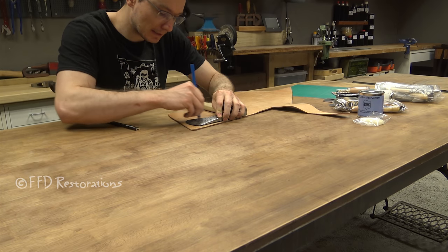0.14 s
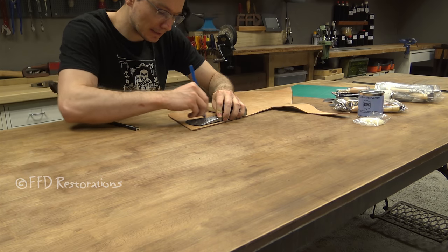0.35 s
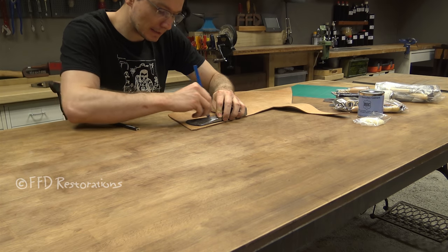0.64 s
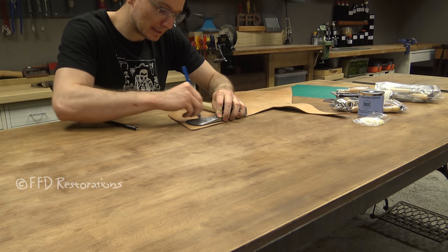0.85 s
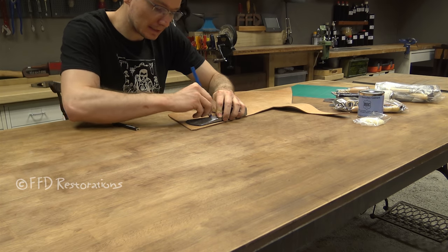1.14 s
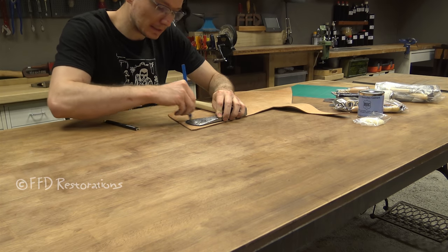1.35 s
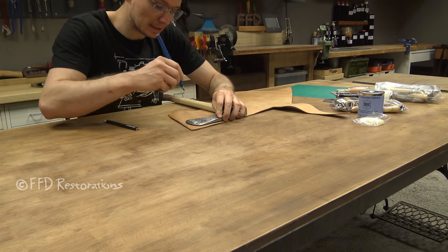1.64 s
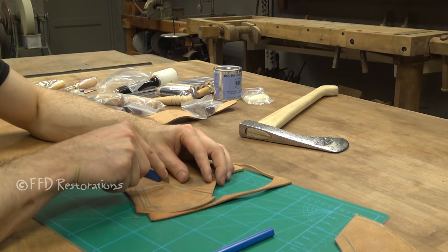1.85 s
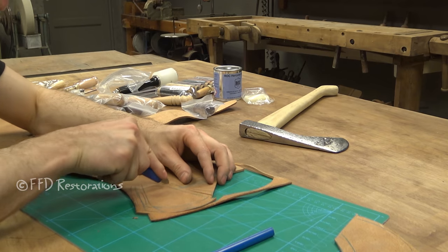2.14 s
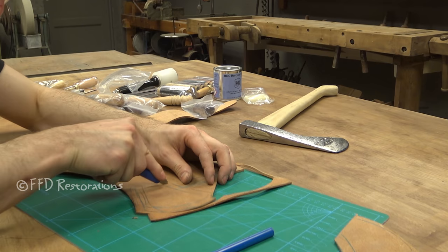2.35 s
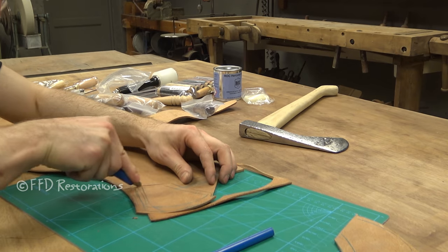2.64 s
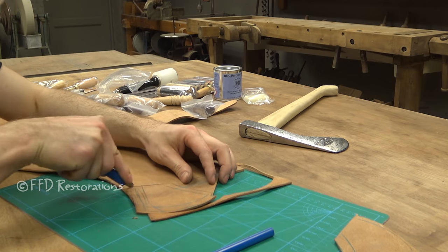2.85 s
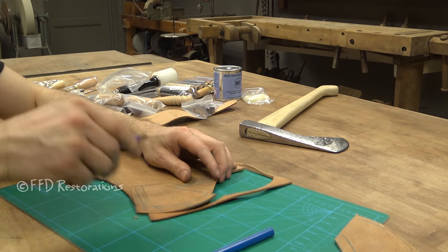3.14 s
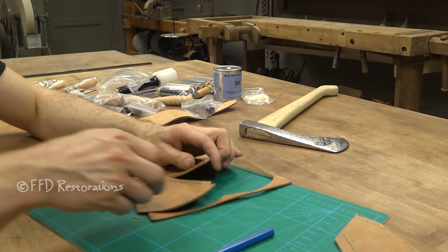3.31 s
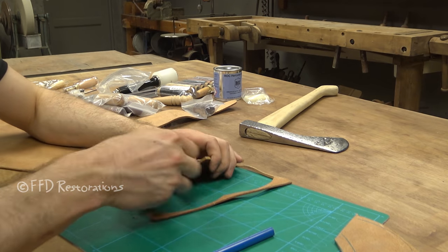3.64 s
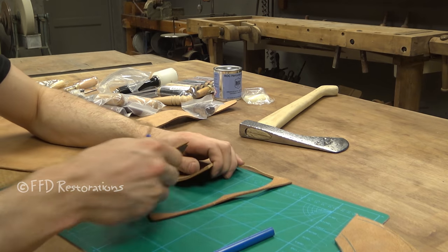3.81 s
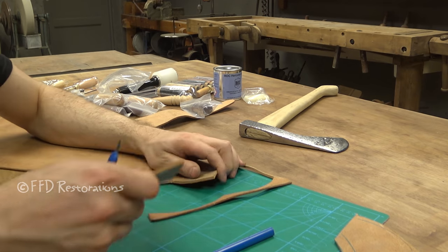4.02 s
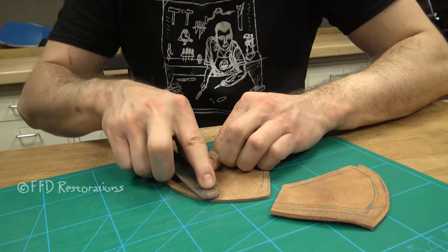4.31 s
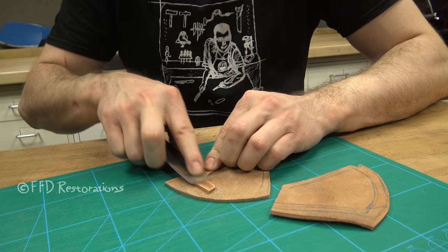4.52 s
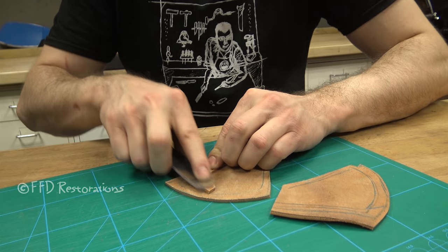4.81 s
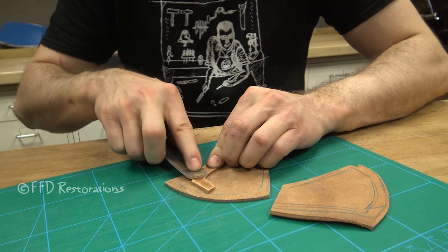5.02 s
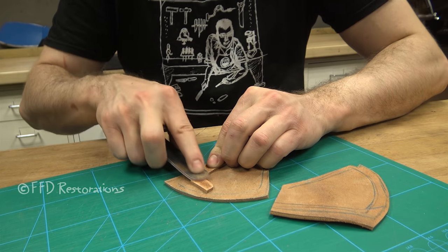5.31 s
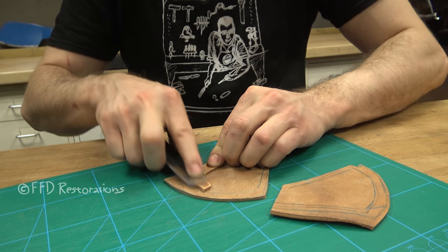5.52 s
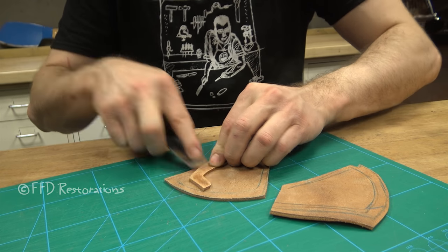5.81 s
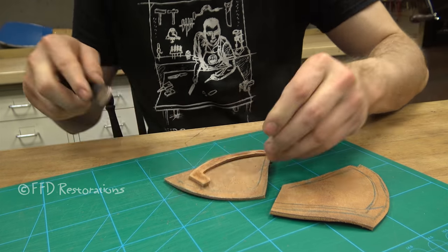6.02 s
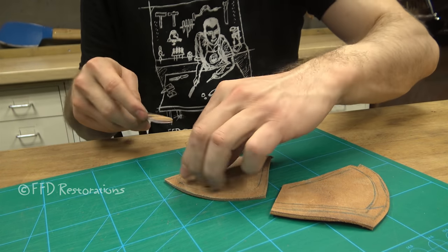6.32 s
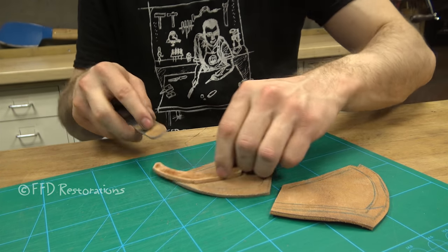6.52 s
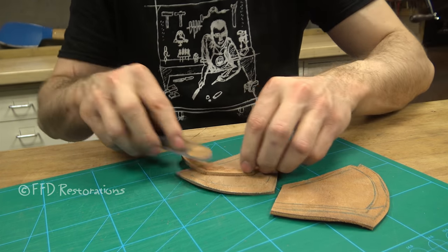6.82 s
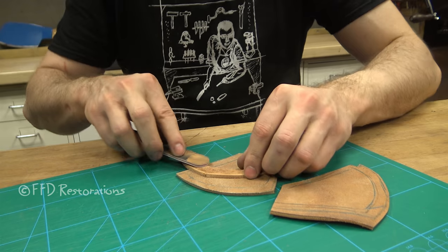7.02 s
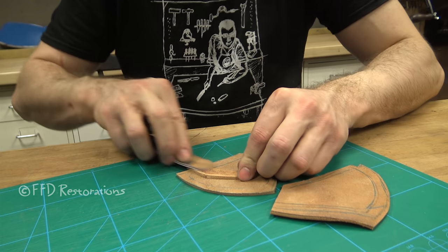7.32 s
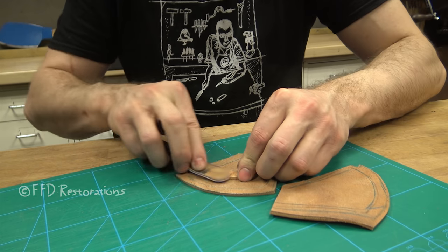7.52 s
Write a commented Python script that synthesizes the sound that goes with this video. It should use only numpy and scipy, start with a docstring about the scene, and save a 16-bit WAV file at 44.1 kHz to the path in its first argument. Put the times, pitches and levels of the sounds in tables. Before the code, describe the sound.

A pen scratches in short strokes on leather, then a knife drags and knocks on a cutting mat, then a block sands an edge rapidly.

```python
"""A pen scratches round an axe head on leather, its pressure droning through the workshop bench.
Then a knife cuts the hide on a mat and is put down; last, a sanding block rubs an edge to and fro.
Rubbing is uneven noise shaped by resonances; ticks are short noise bursts; thuds are decaying bench modes.
The bench sways as slow sines during the last job; a hard-walled room answers with decaying noise.
Mains hum and a faint hiss lie beneath."""
import sys
import numpy as np
from scipy import signal
from scipy.fft import rfft, irfft, next_fast_len
from scipy.io import wavfile
from scipy.ndimage import uniform_filter1d, map_coordinates

SR = 44100
rng = np.random.default_rng(int(sys.argv[2]) if len(sys.argv) > 2 else 0)


def int16_out(signal):
    """Quantize to a 16-bit WAV file."""
    q = np.round(np.clip(np.atleast_2d(signal).T, -1, 1) * 32767)
    wavfile.write(sys.argv[1], SR, q.astype(np.int16))


def volts_from_db(level):
    """Convert decibel levels to linear amplitude ratios."""
    exponent = np.asarray(level, float) / 20
    return 10 ** exponent


N = 337806
TIME = np.arange(N) / SR
# two loose modes of the bench, slow and fast: f/Hz
SWAY_MODES = (10.6, 25.5)


def unit(x):
    """Normalisation of power: x scaled to rms 1."""
    return x / np.sqrt(np.mean(x ** 2) + 1e-20)


def along(points, hz):
    """Spectral interpolation: (f/Hz, value) points read on a logarithmic frequency axis."""
    f, v = np.transpose(points)
    return np.interp(np.log(hz + 1), np.log(f + 1), v)


def gains(rows):
    """Envelopes linear in level: one gain per sample for each dB column, silent outside the table."""
    s, *columns = np.transpose(rows)
    return [volts_from_db(np.interp(TIME, s, column, -150, -150)) for column in columns]


def wobble(rate):
    """Slow random modulation: a smooth curve through normal deviates, rate knots a second."""
    knots = rng.standard_normal(int(N * rate / SR) + 4)
    return map_coordinates(knots, [TIME * rate])


def filtered(x, gain):
    """Linear filtering: the spectrum of x times a gain that depends on frequency."""
    m = next_fast_len(len(x) + 8192)
    return irfft(rfft(x, m) * gain(np.fft.rfftfreq(m, 1 / SR)), m)[:len(x)]


def strokes(rows, rise, fall, lag=0):
    """Exponential onset and decay (dB/s) round a hold that swells: rows of t/s, length/s, level/dB, swell/dB."""
    out = np.zeros(N)
    for s, length, db, swell in rows:
        t = TIME - s - lag
        held = db + swell * (np.clip(t / length, 0, 1) - 0.5)
        onset = np.minimum(0, rise * t)
        decay = np.minimum(0, fall * (length - lag - t))
        out += volts_from_db(held + onset + decay)
    return out


def friction(spectrum, peaks, grain_db, flutter_db, patchy_db):
    """Slip of fibres: uneven noise, its colour drifting as the contact moves, shaped by the rubbed body."""
    unevenness = grain_db * wobble(900) + flutter_db * (wobble(25) + wobble(70))
    slips = rng.standard_normal(N) * volts_from_db(unevenness)
    z = signal.stft(slips, nperseg=256)[2]
    patches = uniform_filter1d(rng.standard_normal(z.shape), size=4, axis=0)  # over frequency
    patches = uniform_filter1d(patches, size=12, axis=1)  # over time
    slips = signal.istft(z * volts_from_db(patchy_db * unit(patches)), nperseg=256)[1][:N]

    def body_gain(hz):
        resonances = sum(db / (1 + (2 * (hz - centre) / width) ** 2) for centre, width, db in peaks)
        return volts_from_db(along(spectrum, hz) + resonances)

    return unit(filtered(slips, body_gain))


def background():
    """Stationary noise and tones: the hiss of room air and slightly unsteady mains hum."""
    # both step down near 4.26 s and dip near 6.3 s: t/s, hiss level/dB, hum level/dB
    quiet_levels = [(0, -48, -44), (4.256, -48, -43), (4.262, -53.5, -47), (6.24, -55, -47),
                    (6.3, -63, -59), (6.33, -61.5, -82), (7.66, -49.5, -37.5)]
    # hum lines, the lowest being the idle tremor of the bench: f/Hz, relative level/dB
    hum_lines = [(26.5, -35), (49.5, 2), (99.5, -23), (118, -17.5), (199, -33)]
    # spectrum of the hiss: f/Hz, relative density/dB per Hz
    air_spectrum = [(38, -9), (65, 1.5), (76, -2.5), (108, -10.5), (171, -11), (226, -13.5), (334, -12.5),
                    (383, -14), (607, -21.5), (666, -19), (941, -19), (1750, -26), (5800, -34.5),
                    (7000, -39), (16000, -39.5)]
    hiss, hum = gains(quiet_levels)
    lines = np.zeros(N)
    for hz, db in hum_lines:
        strength = volts_from_db(db + 2.2 * wobble(2.8))
        lines += strength * np.sin(2 * np.pi * hz * TIME + 0.69 * wobble(2.5))
    air = friction(air_spectrum, [], grain_db=0.8, flutter_db=0.4, patchy_db=0.8)
    return hiss * air + hum * np.sqrt(2) * lines


def room(x):
    """Reverberation: convolution with noise in which each frequency decays at its own rate."""
    # reverberation time: f/Hz, t60/s
    decay_times = [(100, 0.63), (500, 0.57), (2000, 0.42), (6000, 0.43), (14000, 0.067)]
    # colour of the tail at its start: f/Hz, relative level/dB
    tail_colour = [(60, 5.5), (1000, 5.5), (4000, 3.5), (14000, -11)]
    out, hop = np.zeros(N + 2 * SR), SR // 3
    for i in range(0, N, hop):  # a new tail every third of a second
        hz, t, z = signal.stft(rng.standard_normal(SR * 3 // 4), SR, nperseg=256)
        level = along(tail_colour, hz)[:, None] - 60 * t / along(decay_times, hz)[:, None]
        tail = signal.istft(z * volts_from_db(level), SR, nperseg=256)[1]
        wet = signal.fftconvolve(x[i:i + hop], tail / np.linalg.norm(tail))
        out[i + 300:][:len(wet)] += wet  # the first wall is some metres away
    return out[:N]


def sway():
    """Forced oscillation: two loose modes of the bench, pushed unevenly by the arm."""
    # t/s, slow sway level/dB, fast sway level/dB, before the random unevenness
    sway_levels = [(4.26, -22, -43), (4.37, -19, -24), (4.44, -16, -42), (4.53, -20.5, -27.5),
                   (5.75, -23.5, -26.5), (5.89, -18, -22), (5.94, -16, -35), (6.02, -31, -25.5),
                   (6.11, -21, -36), (6.16, -20, -29), (6.23, -33.5, -37), (6.34, -24.5, -43),
                   (6.43, -40, -31), (6.5, -27, -36.5), (6.96, -47, -46), (7.04, -42, -35),
                   (7.43, -17.5, -30.5), (7.66, -16.5, -28)]
    out = np.zeros(N)
    for gain, hz in zip(gains(sway_levels), SWAY_MODES):
        push = gain * volts_from_db(1.8 * wobble(11))
        phase = 2 * np.pi * np.cumsum(hz * (1 + 0.099 * wobble(5.4))) / SR
        out += push * np.sqrt(2) * np.sin(phase)
    fade_in = np.clip((TIME - 4.258) / 0.02, 0, 1)
    return fade_in * out


def taps():
    """Impact excitation: noisy ticks of hard edges, thuds in the bench modes, jolts of its fast sway."""
    # hard edges meeting: t/s, peak level/dB, centre f/Hz
    edge_hits = [(0.518, -28, 4000), (1.454, -26.5, 5000), (1.9868, -28.5, 2480), (2.0835, -29.5, 3670),
                 (2.109, -20, 1950), (2.168, -21.5, 1500), (2.172, -30, 11000), (2.1755, -25.5, 4550),
                 (2.212, -15.5, 3820), (2.2185, -15, 3660), (2.2924, -11.5, 7500), (2.4277, -30.5, 2370),
                 (3.012, -21.5, 3500), (3.015, -12.5, 8040), (3.138, -35, 4000), (3.1472, -22.5, 4540),
                 (3.1599, -9.5, 5500), (3.1894, -37, 5000), (3.4106, -26.5, 2770), (3.512, -46, 1800),
                 (3.7542, -30, 4500), (3.8296, -11, 2350), (3.8621, -18, 2940), (3.8695, -14, 3160),
                 (3.892, -23, 2000), (3.915, -28, 2500), (3.935, -27, 4950), (6.0612, -27.5, 2600),
                 (6.099, -36, 2860), (6.1315, -44, 2880), (6.328, -44, 1500), (6.3879, -44, 1800),
                 (6.4126, -26.5, 3080), (6.669, -33, 3100), (6.8132, -40.5, 2000), (6.93, -44, 1820),
                 (6.9636, -28.5, 2590), (7.026, -34.5, 2200)]
    # knife, hand and hide landing on the bench: t/s, peak level/dB, centre f/Hz
    landings = [(1.9872, -26, 1010), (2.0837, -26.5, 1100), (2.11, -17, 990), (2.166, -19, 213),
                (2.2107, -6.5, 890), (2.2182, -20.5, 278), (2.245, -22, 950), (2.262, -21, 293),
                (2.29, -18, 270), (2.4267, -28, 297), (3.0116, -13, 1280), (3.017, -18.5, 507),
                (3.4098, -27.5, 414), (3.6529, -25, 400), (3.8305, -13, 1310), (3.836, -22, 110),
                (3.861, -13.5, 182), (3.8704, -18, 303), (3.9, -23.5, 174), (6.0591, -32.5, 685),
                (6.3879, -33.5, 885), (6.4116, -35.5, 1190), (6.8134, -41.5, 410), (6.9632, -34, 1300),
                (7.025, -36, 1500)]
    # the heaviest landings shake the whole bench: t/s, starting level/dB
    shakes = [(2.2102, -30.5), (3.01, -46), (3.831, -29.5)]
    # modes of the knocked bench top, varied a little at each landing: f/Hz, relative level/dB, t60/s
    bench_modes = [(69.7, 1, 0.25), (105, -1, 0.03), (180, -3, 0.047), (267, -4, 0.06), (387, 4.5, 0.013),
                   (498, 2.5, 0.019), (585, 9.5, 0.015), (835, 12, 0.013), (998, 9.5, 0.014),
                   (1208, 2, 0.031), (1470, -4, 0.017), (1550, 4, 0.017), (1960, -29, 0.013)]
    narrow_db = 5.5  # loss per octave squared off the centre
    contact_s = 0.00083  # time constant of a soft landing's rise
    ticks, thuds, t = np.zeros(N + SR), np.zeros(N + SR), TIME[:SR // 2]
    for s, db, hz in edge_hits:
        # the edge chatters, then dies
        crack = rng.standard_normal(len(t)) * volts_from_db(-60 * np.maximum(t - 0.0016, 0) / 0.0099)
        band = [0.49 * hz, min(1.54 * hz, 15500)]
        tick = signal.sosfilt(signal.butter(2, band, "bandpass", fs=SR, output="sos"), crack)
        ticks[round(s * SR):][:len(t)] += volts_from_db(db) * tick / np.abs(tick).max()
    for s, db, hz in landings:
        ring = np.zeros(len(t))
        for f, mode_db, t60 in bench_modes:
            level = mode_db + rng.normal(0, 2.7) - narrow_db * np.log2(f / hz) ** 2
            mode = np.sin(2 * np.pi * f * rng.normal(1, 0.025) * t)
            ring += volts_from_db(level - 60 * t / t60) * mode
        ring *= 1 - np.exp(-t / contact_s)
        thuds[round(s * SR):][:len(t)] += volts_from_db(db) * ring / np.abs(ring).max()
    for s, db in shakes:
        jolt = volts_from_db(db - 60 * t / 1.27) * np.sin(2 * np.pi * SWAY_MODES[1] * t)
        thuds[round(s * SR):][:len(t)] += jolt
    return ticks[:N], thuds[:N]


def sanding():
    """Speed-dependent friction: each stroke swells and halts; treble needs speed, the block hums on longer."""
    # strokes: t/s, nominal treble level/dB
    sanding_strokes = [(4.277, -41), (4.416, -40.5), (4.565, -43), (4.702, -42), (4.841, -40),
                       (4.979, -39.5), (5.116, -39.5), (5.251, -39.5), (5.393, -38), (5.534, -38),
                       (5.667, -40), (5.811, -35.5), (7.176, -38), (7.326, -35), (7.485, -35), (7.635, -38)]
    # spectrum of the grit: f/Hz, relative density/dB per Hz
    grit_spectrum = [(150, -9), (250, -9), (342, -2), (618, -4), (761, 5), (831, 1.5), (1450, 5),
                     (2530, -4.5), (3650, -2), (4340, -11.5), (5250, -10.5), (8550, -14.5), (12300, -10.5),
                     (16000, -17.5)]
    # resonances that friction brings out: f/Hz, width/Hz, gain/dB
    block_peaks = [(743, 7.8, 4.3), (1296, 27, 8.7), (1786, 20, 9.6), (4000, 110, 1), (5430, 1500, 5.7)]
    stroke_s = 0.15
    fizz, body = np.zeros(N), np.zeros(N)
    for s, db in sanding_strokes:
        progress = np.clip((TIME - s + 0.012) / stroke_s, 0, 1)
        speed = np.abs(np.sin(np.pi * progress ** 0.92))
        fizz += volts_from_db(db) * np.clip(1.132 * speed - 0.25, 0, 1) ** 1.03
        body += volts_from_db(0.64 * (db + 30) - 39.5) * speed ** 0.5  # varies less than the treble
    grit = friction(grit_spectrum, block_peaks, grain_db=1.5, flutter_db=0.6, patchy_db=1.5)
    low = filtered(grit, lambda hz: 1 / (1 + (hz / 2400) ** 4))
    return fizz * unit(grit - low) + body * unit(low)


def hide():
    """Dragging friction: blade and hide catch unevenly on the mat; later only fingers turn the piece."""
    # knife and hide dragged on the mat: t/s, length/s, rasp level/dB, bench drone level/dB, swell/dB
    mat_drags = [(1.981, 0.061, -53.5, -54, -4), (2.111, 0.066, -49.5, -40, -1),
                 (2.218, 0.095, -44.5, -36, -6), (2.334, 0.087, -55.5, -48, -7),
                 (2.465, .05, -35.5, -39.5, 0), (2.543, 0.32, -40.5, -38, 0),
                 (2.971, 0.043, -36.5, -36.5, 13.5), (3.046, 0.04, -49.5, -41, 7),
                 (3.153, 0.047, -45, -67, -4), (3.262, 0.1, -42.5, -47, 0),
                 (3.411, 0.047, -49.5, -46.5, -3), (3.488, 0.024, -49.5, -44, 3),
                 (3.55, 0.057, -61, -63, -7), (3.657, 0.087, -48, -47.5, -3.5),
                 (3.762, 0.025, -48.5, -42.5, 3), (3.844, 0.041, -43.5, -29.5, -4),
                 (3.903, 0.044, -40.5, -35.5, 3), (3.981, 0.12, -49.5, -50.5, -1),
                 (4.154, 0.12, -55, -59, -2)]
    # fingers turning the piece between the sanding runs: t/s, length/s, rustle level/dB, drone level/dB, swell/dB
    finger_turns = [(5.94, .19, -55, -66, -10), (6.23, 0.041, -63, -90, 7), (6.33, 0.14, -52, -51.5, 11.5),
                    (6.56, 0.051, -54.5, -57, -3), (6.67, 0.061, -55, -70, 4), (6.77, 0.089, -61, -74, -2),
                    (6.88, 0.067, -57.5, -59.5, -5), (6.97, 0.2, -56.5, -54.5, -1)]
    # spectra of the rasp, of skin on hide (duller) and of the drone: f/Hz, relative density/dB per Hz
    rasp_spectrum = [(1180, -61), (2000, -13.5), (2640, 0), (3870, -1), (4450, -5.5), (5350, 0),
                     (7570, -6.5), (12000, -9), (14900, -13), (16000, -20)]
    skin_spectrum = [(1180, -27), (2000, -11), (2530, -3.5), (4080, -2), (4450, -4), (5390, -6),
                     (14700, -17.5), (16000, -8.5)]
    drone_spectrum = [(60, -24), (120, 3), (200, -1), (400, -2.5), (650, -6.5), (830, -4), (1100, -3),
                      (1490, -2), (1900, -4.5), (2600, -12.5), (3400, -25), (5700, -120)]
    # resonances that friction brings out: f/Hz, width/Hz, gain/dB
    mat_peaks = [(1150, 46, 1.8), (1960, 51, 10), (3320, 270, 3.5), (3780, 190, 3.4), (5500, 120, 1)]
    rise, rub_fall, drone_fall = 470, 600, 768  # dB/s
    bright_hz, brighter = 6500, 0.2  # above this the rasp grows faster than its level, by this power
    blade = strokes([(s, n, db, up) for s, n, db, _, up in mat_drags], rise, rub_fall)
    skin = strokes([(s, n, db, up) for s, n, db, _, up in finger_turns], rise, rub_fall)
    drone = strokes([(s, n, db, up) for s, n, _, db, up in mat_drags + finger_turns], rise, drone_fall)
    catch = volts_from_db(0.9 * wobble(16))
    rasp = friction(rasp_spectrum, mat_peaks, grain_db=1.5, flutter_db=1.3, patchy_db=1.5)
    top = filtered(rasp, lambda hz: 1 / (1 + (bright_hz / (hz + 1)) ** 4))
    rasp = rasp + top * ((blade / volts_from_db(-37.5)) ** brighter - 1)
    rustle = friction(skin_spectrum, [], grain_db=2.5, flutter_db=1.2, patchy_db=3)
    body = friction(drone_spectrum, mat_peaks, grain_db=2, flutter_db=0.5, patchy_db=1.2)
    return catch * (blade * rasp + skin * rustle + drone * body)


def pen():
    """Structure-borne friction: the tip scratches, its pressure drones in the bench, a bearing hand booms."""
    # strokes of uneven pressure, the last one faint: t/s, length/s, scratch level/dB, pressure level/dB,
    # pressure swell/dB
    pen_strokes = [(-0.05, 0.11, -44, -39.5, -4), (0.159, 0.17, -45, -39.5, -1.5),
                   (0.421, 0.12, -45.5, -41, 1.5), (0.623, 0.15, -44, -38, -4),
                   (0.842, 0.2, -45, -43.5, 4.5), (1.067, 0.13, -47, -37, 5.5),
                   (1.287, 0.19, -44.5, -38, -1), (1.503, .05, -57, -50.5, -5)]
    # the hand bears down: t/s, boom level/dB, low thrum level/dB
    hand_booms = [(0.18, -40, -46.5), (0.245, -41.5, -33), (0.47, -46, -42), (0.64, -52, -40),
                  (0.69, -46, -41), (0.73, -36, -45), (0.87, -43, -51), (1.059, -46, -40.5),
                  (1.15, -38, -41), (1.38, -49, -50), (1.46, -49, -43.5)]
    # spectra of scratch, drone and low thrum: f/Hz, relative density/dB per Hz
    tip_spectrum = [(1000, -10), (1700, -2.5), (2170, 3.5), (2640, 2), (5440, -0.5), (7480, -8),
                    (10500, -11), (12000, -10.5), (15100, -18), (16000, -15)]
    pressure_spectrum = [(320, -46), (550, 2.5), (970, -2.5), (1090, 0), (1200, -6), (2000, -16.5),
                         (2600, -27), (4400, -120)]
    thrum_spectrum = [(88, -55), (150, 2.5), (292, -2.5), (438, 0.5), (520, -15), (680, -42), (1140, -120)]
    # resonances that friction brings out: f/Hz, width/Hz, gain/dB
    pen_peaks = [(181.2, 5.6, 12.5), (237, 38, 5.5), (449, 47, 4), (698, 35, 4), (866, 22, 13),
                 (1100, 33, 7.5), (1373, 90, 8.5)]
    tip_rise, tip_fall = 360, 630  # dB/s
    press_rise, press_fall = 810, 430  # dB/s
    thrum_db = -9  # thrum over drone
    boom_hz, boom_s = 103, 0.012  # a low ring of the bench top and its hold

    scratch = strokes([(s, n, db, 1.5) for s, n, db, _, _ in pen_strokes], tip_rise, tip_fall)
    drone = strokes([(s, n, db, up) for s, n, _, db, up in pen_strokes], press_rise, press_fall)
    thrum = strokes([(s, n, db + thrum_db, up) for s, n, _, db, up in pen_strokes],
                    press_rise, press_fall, lag=0.016)
    thrum += strokes([(s, boom_s, db, 0) for s, _, db in hand_booms], 236, 198)
    boom = strokes([(s, boom_s, db, 0) for s, db, _ in hand_booms], 400, 132)

    scratch = scratch * volts_from_db(0.4 * wobble(22))
    scratch *= friction(tip_spectrum, [], grain_db=1.5, flutter_db=1.34, patchy_db=3.2)
    drone = drone * volts_from_db(0.77 * wobble(14))
    drone *= friction(pressure_spectrum, pen_peaks, grain_db=2, flutter_db=-1.1, patchy_db=3)
    thrum *= friction(thrum_spectrum, pen_peaks, grain_db=0, flutter_db=1.2, patchy_db=1.5)
    boom = boom * np.sqrt(2) * volts_from_db(1.5 * wobble(12))
    boom *= np.sin(2 * np.pi * boom_hz * TIME + 2.1 * wobble(12.05))
    return scratch + drone + thrum + boom


def scene():
    """Superposition of direct sound, echo, sway and background; the last job is nearer, so drier."""
    rubbing = pen() + hide() + sanding()
    ticks, thuds = taps()
    # the bench top radiates all round, an edge hardly
    sent = volts_from_db(-14.5) * rubbing + volts_from_db(-15.5) * ticks + volts_from_db(-8.5) * thuds
    far = TIME < 4.258
    echo = far * room(far * sent) + volts_from_db(-2.5) * room(~far * sent)
    return (rubbing + ticks + thuds + echo + sway() + background())[None]


def roll_off(x):
    """The treble ends steeply here."""
    return signal.sosfilt(signal.butter(12, 16510, fs=SR, output="sos"), x)


def record(dry):
    """Band limitation: a steep low-pass at 16.1 kHz finishes the mix."""
    mix = filtered(dry[0], lambda hz: 1 / (1 + (hz / 16100) ** 60))[None]
    return roll_off(mix)


dry = scene()
out = record(dry)
int16_out(out)
```